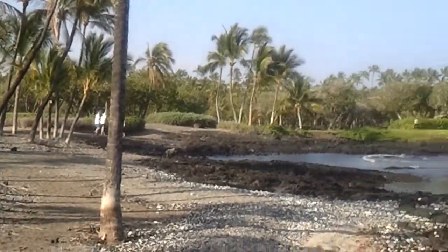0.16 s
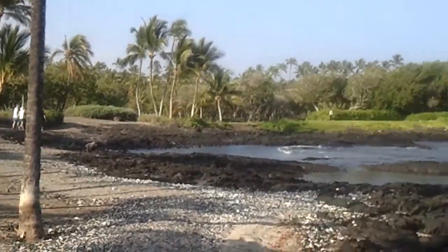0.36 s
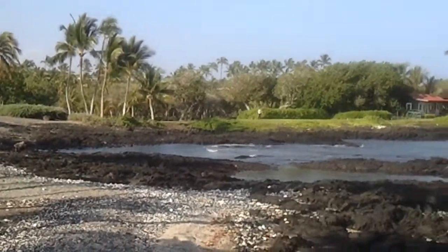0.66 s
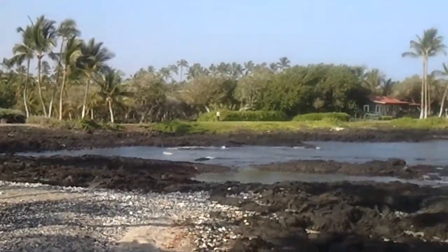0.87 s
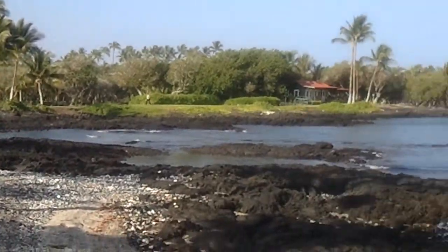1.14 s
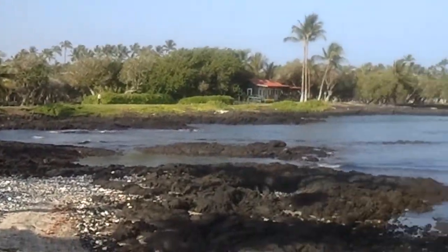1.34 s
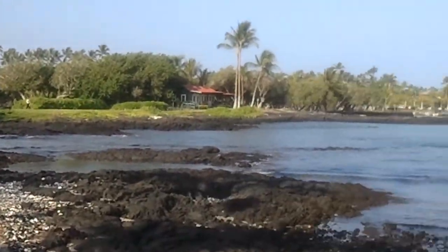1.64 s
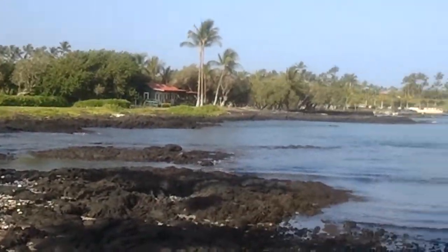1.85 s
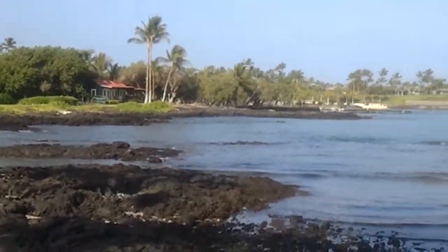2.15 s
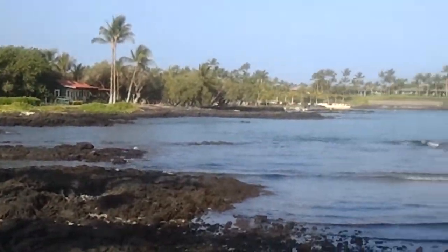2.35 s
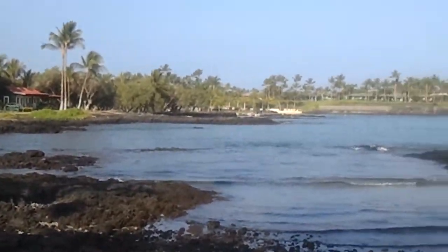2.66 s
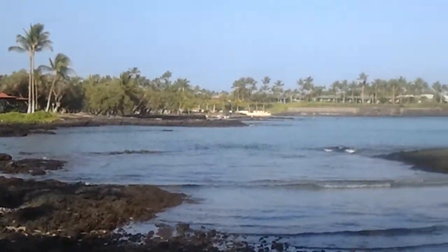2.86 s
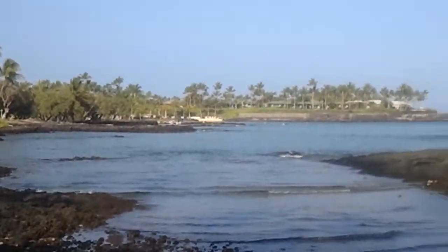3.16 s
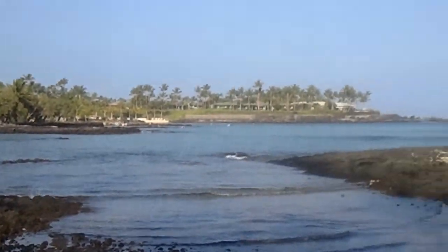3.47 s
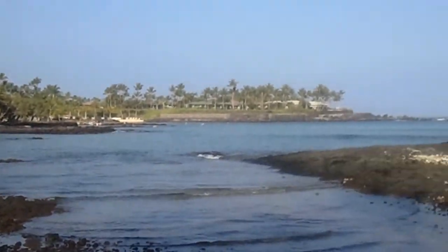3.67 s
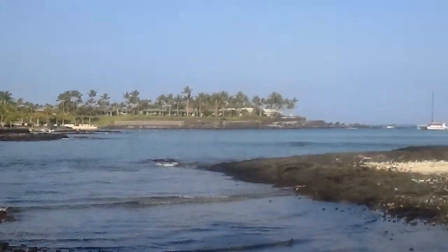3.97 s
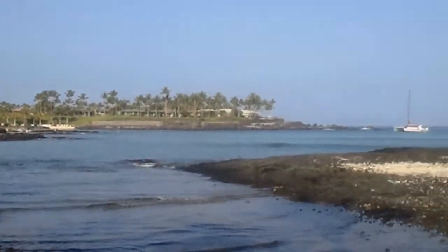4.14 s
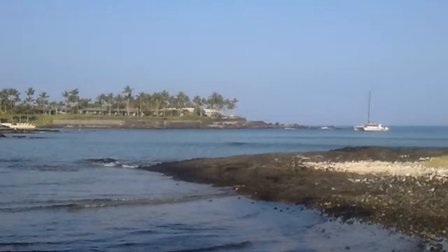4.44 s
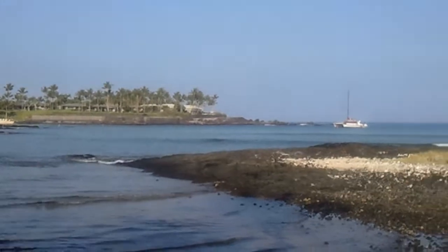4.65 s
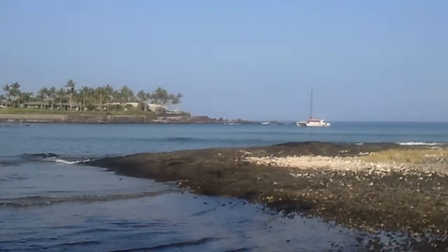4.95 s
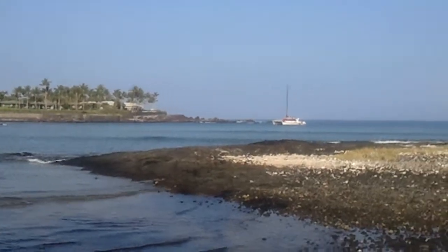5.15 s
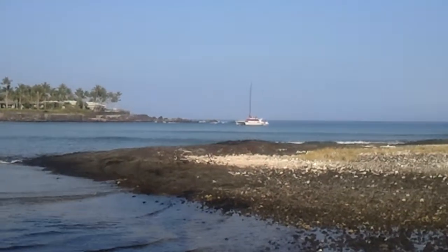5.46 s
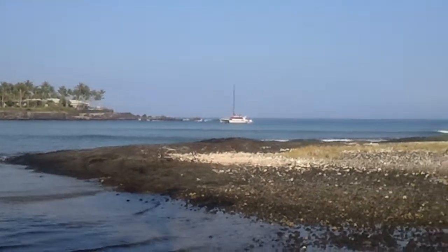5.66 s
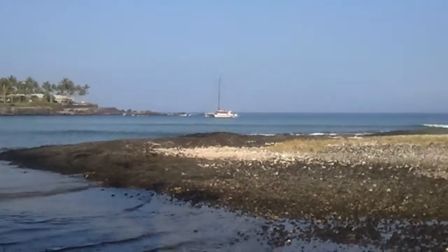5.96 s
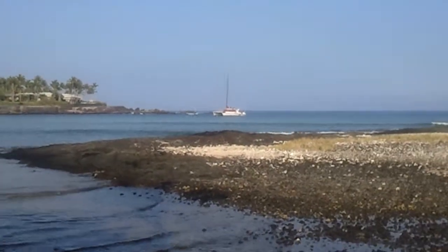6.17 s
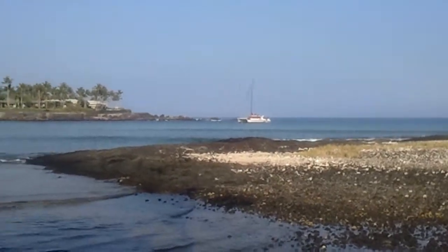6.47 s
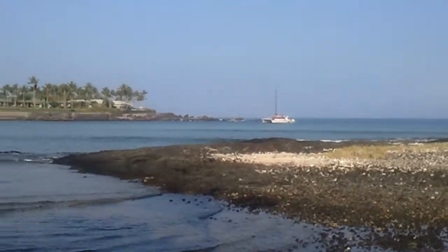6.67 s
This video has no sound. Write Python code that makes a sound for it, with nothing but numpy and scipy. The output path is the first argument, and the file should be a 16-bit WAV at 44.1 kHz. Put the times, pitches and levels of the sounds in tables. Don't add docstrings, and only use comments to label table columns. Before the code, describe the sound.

On a rocky shore, soft continuous wave wash with bubbling and faint foam fizz lies under everything. Loud, brittle gravel cracks come close by in the first 0.7 seconds, while a bird sings short burred chirps, two voices at once, through the first two seconds. Afterwards the water is left alone, with one sharp pebble click midway, tiny ticks and several hollow plops late. Mono, modest small microphone.

```python
import sys
import numpy as np
from scipy import signal
from scipy.io import wavfile
from scipy.ndimage import uniform_filter1d

SR = 44100
rng = np.random.default_rng(int(sys.argv[2]) if len(sys.argv) > 2 else 0)


def to_wav(sig):
    pcm = np.clip(np.atleast_2d(sig), -1, 1) * 32767
    pcm = np.round(pcm).astype(np.int16)
    wavfile.write(sys.argv[1], SR, pcm.T)


def volts_from_db(level):
    exponent = np.asarray(level, float) / 20
    return 10 ** exponent


N = 300321

# (time [s], length [s], grit level [dB], low push level [dB])
STEPS = [
    (0.037, .018, -19, -36.5),
    (0.051, .024, -12.5, -38),
    (0.093, .014, -27, -51),
    (.465, .026, -21.5, -30.5),
    (.488, .026, -19, -30),
    (0.511, 0.02, -14, -38),
]

# (time from main note [s], length [s], start pitch [Hz], end pitch [Hz], level re main note [dB])
FALLING = [
    [(-.003, .011, 3020, 2400, -1), (0, .035, 2580, 2360, 0)],
    [(-.018, .013, 2950, 2640, -5), (.037, .022, 1790, 1900, -3), (.062, .02, 2000, 1790, -15)],
    [],
    [(-.068, .058, 3200, 3300, -20)],
]
FLAT = [
    [(-.001, .005, 2950, 2360, -8.5), (0, 0.019, 2450, 2400, 0.5), (.022, 0.024, 2340, 2465, -3.5),
     (.041, .04, 2360, 2380, -8)],
    [(-.015, 0.012, 2840, 2700, -10), (.04, .009, 1800, 2210, -2.5), (.052, .007, 1835, 2280, 0.5),
     (.056, 0.028, 2070, 1700, -9)],
    [(-.063, 0.047, 2880, 3140, -14.5), (.054, 0.04, 1050, 920, -17)],
    [(-0.034, 0.096, 3400, 3800, -16.5)],
]
RISING = [
    [(0.0014, 0.012, 2380, 2660, 0.012)],
    [(.017, .026, 2680, 2620, -8)],
    [(.053, .06, 1930, 2020, -11.5)],
    [(-.012, .115, 2500, 2550, -7)],
]
LEVEL = [
    [(0, 0.02, 3070, 3140, -0.5), (.003, 0.023, 6800, 5970, -17)],
    [(0, .035, 6900, 6550, -18), (-.023, .016, 3200, 3150, -11)],
    [(.045, 0.043, 1885, 1850, -10)],
    [],
]


def rms_one(x):
    return x / np.sqrt(np.mean(x ** 2) + 1e-20)


def in_time(rows):
    s, *columns = np.transpose(rows)
    return [np.interp(np.arange(N) / SR, s, c) for c in columns]


def band(x, low_hz, high_hz):
    edges = [low_hz, min(high_hz, 20000)]
    return signal.sosfilt(signal.butter(2, edges, "band", fs=SR, output="sos"), x)


def drift(rate, size=N):
    r = np.exp(-2 * np.pi * rate / SR)
    run_in = 9000
    noise = rng.standard_normal(size + run_in)
    return rms_one(signal.lfilter([1], [1, -2 * r, r * r], noise)[run_in:])


def ring(clicks, hz, t60):
    r, w = volts_from_db(-60 / (t60 * SR)), 2 * np.pi * hz / SR
    return signal.lfilter([0, np.sin(w)], [1, -2 * r * np.cos(w), r * r], clicks + 1e-18)


def grains(per_s, spread_db, low_hz, high_hz, cycles):
    sizes = volts_from_db(spread_db * np.minimum(rng.exponential(1, N), 4)) * rng.choice([-1, 1], N)
    clicks = sizes * (rng.random(N) < per_s / SR)
    dealt = rng.integers(0, 16, N)
    pitches = np.geomspace(low_hz, high_hz, 16)
    return rms_one(sum(ring(clicks * (dealt == k), hz, cycles / hz) for k, hz in enumerate(pitches)))


def add(out, s, piece):
    i = round(s * SR)
    out[i:i + len(piece)] += piece[:N - i]


def swell(s, length, rise, fall):
    corners = [s - rise, s, s + length, s + length + fall]
    return np.interp(np.arange(N) / SR, corners, [0, 1, 1, 0])


def hump(hz, centre_hz, octaves):
    return np.exp(-(np.log2(hz / centre_hz) / octaves) ** 2)


def foam_sheets():
    # (time [s], length [s], level [dB], centre pitch [Hz])
    sheets = [
        (0.01, 0.26, -54, 3740),
        (0.59, .15, -45.5, 3630),
        (2.6, 0.16, -41, 3850),
        (2.92, 0.11, -40, 3830),
        (3.682, 0.25, -47.5, 3510),
        (5.434, 0.18, -47, 3770),
        (6.242, 0.09, -47, 3720),
        (6.5, 0.18, -46.5, 3680),
    ]
    rest_gain, rest_hz = volts_from_db(-57), 3830
    rise_s, fall_s = .15, .09
    gains = np.array([volts_from_db(db) * swell(s, length, rise_s, fall_s) for s, length, db, _ in sheets])
    total = rest_gain + gains.sum(axis=0)
    centre_hz = (rest_gain * rest_hz + np.array(sheets)[:, -1] @ gains) / total
    return total, centre_hz


def wash(wash_db, patchy_db):
    # (pitch [Hz], level per Hz [dB])
    colour = [(24, -56.5), (40, -27.5), (119, -8), (258, -3), (429, -9), (730, -1), (996, -6), (1300, -1.5),
              (1620, -4.5), (1890, -2.5), (2360, -6.5), (2700, -8), (3080, -10.5), (3760, -12.5),
              (8000, -24), (10400, -63), (17600, -120)]
    # (time [s], pitch [Hz], depth [dB])
    dip = [(0, 2880, -2.5), (3.2, 2870, -1.5), (3.7, 3060, 11), (4.3, 3080, 4.5), (5.7, 2730, 1),
           (6.81, 2680, 5)]
    low_edges = 22 * 2 ** np.arange(0, 3.9, 1 / 2)
    high_edges = 352 * 2 ** np.arange(0, 4.9, 1 / 6)
    edges = np.r_[low_edges, high_edges]
    waves, foam = 0, 0
    white = rng.standard_normal((2, N))
    together, own = drift(4.5), drift(15.0, size=N + 40 * 9000)
    points = np.array(colour)
    dip_hz, dip_db = in_time(dip)
    foam_gain, foam_hz = foam_sheets()
    for k, (low, high) in enumerate(zip(edges, edges[1:])):
        hz = np.sqrt(low * high)
        flicker_db = patchy_db * (0.49 * together + own[k * 9000:][:N])
        noise = band(white[k % 2], low, high) * volts_from_db(flicker_db)
        db = np.interp(np.log(hz), np.log(points[:, 0]), points[:, 1])
        waves = waves + volts_from_db(db - dip_db * hump(hz, dip_hz, 0.13)) * noise
        foam = foam + hump(hz, foam_hz, 0.16) * noise
    return volts_from_db(wash_db) * rms_one(waves) + volts_from_db(-9.5) * foam_gain * rms_one(foam)


def knocks():
    # (time [s], peak level [dB], pitch [Hz])
    hollows = [
        (1.964, -28, 630),
        (3.647, -34, 800),
        (4.618, -22, 1870),
        (5.084, -21.5, 765),
        (6.514, -27, 2150),
        (6.657, -20, 1420),
        (6.724, -24, 1530),
    ]
    out, click = np.zeros(N), np.eye(1, 1500)[0]
    for s, db, hz in hollows:
        add(out, s, volts_from_db(db - 8.0) * ring(click, hz, 0.028))
    return out


def shore():
    # (time [s], wash level [dB])
    waves = [(0.0, -42.5), (0.2, -43.5), (0.62, -43), (1.31, -45), (1.61, -45.5), (2.48, -43.5),
             (2.69, -42), (3.41, -41.5), (4.8, -41.5), (5.71, -42.5), (6.22, -42), (6.81, -39.5)]
    wash_db, = in_time(waves)
    swing_db = wash_db - wash_db.mean()
    gurgle_db = -52.5 - .8 * swing_db
    gurgle = volts_from_db(gurgle_db) * grains(400, 2.7, 620, 2520, cycles=18.0)
    spray_db = -58 - .3 * swing_db - .5 * drift(2.1)
    spray = volts_from_db(spray_db) * grains(1400, 3.8, 5200, 10500, cycles=4.5)
    return wash(wash_db + 0.67, patchy_db=1.16) + gurgle + knocks() + spray


def trees(x):
    t = np.arange(SR // 2) / SR
    t60_s, first_echo_s = .4, .008
    sparse = rng.standard_normal(len(t)) * (rng.random(len(t)) < .05)
    echoes = sparse * volts_from_db(-60 * t / t60_s) * (t > first_echo_s)
    return signal.fftconvolve(x, echoes / np.sqrt(np.sum(echoes ** 2)))[:N]


def notes():
    roughness = [
        .15,
        .5,
        0.849,
        1.7,
    ]
    # (time [s], length [s], start pitch [Hz], end pitch [Hz], rms level [dB])
    warble = [
        [(.125, 0.0085, 2320, 3050, -37.5)],
        [(.137, 0.019, 2510, 2200, -34.5), (.14, .023, 3150, 2950, -43)],
        [(.082, 0.019, 2366, 2170, -36), (.1, 0.029, 2990, 2995, -41), (.147, .02, 1690, 910, -35.5),
         (.165, 0.014, 2350, 2150, -36.5)],
        [(.085, .095, 2800, 2410, -38)],
    ]
    leads = [
        [(.573, 0.014, 3150, 4000, -39), (1.425, .009, 2350, 3420, -47), (1.439, 0.0062, 2700, 3450, -40),
         (1.77, 0.006, 3560, 4270, -36)],
        [(1.775, 0.078, 4780, 4880, -49), (1.13, .044, 1470, 2180, -47), (1.448, 0.017, 3170, 3100, -38),
         (1.477, .011, 4500, 2850, -45), (1.78, 0.012, 3670, 4500, -40), (1.797, 0.0062, 3300, 3080, -30.5),
         (1.809, .007, 3300, 3120, -32), (2.077, 0.029, 954, 1145, -45), (2.078, .026, 2084, 2136, -36.5),
         (2.083, 0.021, 3130, 3140, -41.5)],
        [(0.22, 0.04, 3650, 3950, -47), (1.3, 0.023, 3350, 3560, -41), (.218, .039, 2920, 3630, -40)],
        [(1.765, 0.02, 3960, 4470, -49), (1.79, .05, 3940, 3760, -41.5), (2.102, .013, 2230, 2900, -45)],
    ]
    turns = [
        [(.582, 0.042, 3930, 3850, -40), (1.25, .011, 3036, 2250, -38), (1.262, 0.017, 3050, 2150, -41)],
        [(.625, 0.021, 3100, 2600, -38), (1.172, 0.032, 3600, 3440, -43), (2.137, 0.021, 3190, 3650, -43),
         (2.159, 0.0209, 2310, 1624, -29)],
        [(.65, 0.058, 2390, 2010, -40.5), (1.845, .03, 1870, 1860, -38), (1.865, 0.052, 1249, 1295, -38),
         (2.177, 0.057, 1566, 927, -37)],
        [(1.86, .063, 2510, 2180, -51)],
    ]
    overtones = [(0.232, 0.1, 5800, 6700, -49), (.85, 0.017, 6370, 6700, -51.5),
                 (.865, .012, 5450, 5300, -49), (0.894, 0.048, 7340, 7050, -53),
                 (1.142, .05, 6400, 6500, -54), (1.433, 0.079, 6410, 6620, -46.5),
                 (1.455, .035, 5280, 5270, -51), (1.773, .067, 6500, 6310, -52),
                 (1.496, .04, 7240, 6360, -48.5)]
    # (shape, [(main note time [s], rms level [dB], pitch factor [ratio])])
    sung = [
        (FALLING, [(.295, -27.5, 0.99), (1.497, -29, 1)]),
        (FLAT, [(.903, -27.5, 0.99)]),
        (RISING, [(.575, -34.5, 1.06), (1.165, -37.5, .93)]),
        (LEVEL, [(1.828, -28, 0.99), (2.125, -29.5, 1)]),
    ]
    once = [(0, 0, 1)]
    rows = [(*note, roughness[2]) for note in overtones]
    for pattern, phrases in sung + [(warble, once), (leads, once), (turns, once)]:
        for s, db, pitch in phrases:
            for rough, voice in zip(roughness, pattern):
                for late, length, start_hz, end_hz, note_db in voice:
                    rows.append((s + late, length, pitch * start_hz, pitch * end_hz, db + note_db, rough))
    return rows


def bird():
    out, waver = np.zeros(N), (drift(220) + 1j * drift(210)) / np.sqrt(2)
    for k, (s, length, start_hz, end_hz, db, rough) in enumerate(notes()):
        count = round((length + 0.0033) * SR)
        share = np.clip(rough, 0, 1)
        pace = .3 + 1.2 * rough ** 2 * start_hz / 3000
        own = waver[(k * 3000 + (pace * np.arange(count)).astype(int)) % N]
        phase = 2 * np.pi * np.cumsum(np.linspace(start_hz, end_hz, count)) / SR
        steadiness = np.sqrt(1 - share ** 2) + 2.3 * share * own
        tone = rms_one(np.real(steadiness * np.exp(1j * phase)))
        add(out, s - .002, volts_from_db(db) * signal.windows.tukey(count, .45) * tone)
    effort = np.abs(uniform_filter1d(np.abs(out), 700)) ** 0.66
    air = rng.standard_normal(N)
    rasp = rms_one(band(air, 2200, 3300)) + volts_from_db(-7) * rms_one(band(air, 5400, 7500))
    return out + volts_from_db(-25.0) * effort * rasp


SETTLE_DB = -10.5


def crunch():
    coarse = grains(2200, 1.3, 1200, 3880, cycles=21.0)
    fine = grains(3500, 4.8, 2800, 9100, cycles=3.6)
    grit = coarse + volts_from_db(-15) * fine
    push = rms_one(band(rng.standard_normal(N), 220, 650))
    out = np.zeros(N)
    press_s, lift_s = .004, .012
    for s, length, grit_db, push_db in STEPS:
        settle_db = SETTLE_DB * np.clip((np.arange(N) / SR - s) / length, 0, 1)
        grinding = volts_from_db(grit_db + settle_db - 8) * grit + volts_from_db(push_db - 4) * push
        out += swell(s, length, press_s, lift_s) * grinding
    return out


def slips():
    gap_s, level_db, spread_db = .0027, 4, 5
    centre_hz, octaves, snap_db = 1420, .23, -18.5
    rows = []
    for s, length, grit_db, _ in STEPS:
        for k, (late, size, pitch) in enumerate(rng.standard_normal((12, 3))):
            t = gap_s * (k + .3 * late)
            db = grit_db + level_db + SETTLE_DB * t / length + spread_db * size
            if t < length:
                rows.append((s + t, min(db, -13), centre_hz * 2 ** (octaves * pitch), snap_db))
    return rows


def stones():
    # (time [s], peak level [dB], ring pitch [Hz], level of the brighter
    # snap re peak [dB])
    cracks = [(0.0392, -9, 1590, -17), (0.0426, -11, 1380, -24), (0.0531, -12, 880, -19),
              (0.0561, -9, 1100, -20), (0.0605, -12, 1420, -19), (0.0642, -7, 1030, -27),
              (0.0661, -10, 1140, -28), (0.0906, -11, 1360, -23), (0.2326, -24, 1250, -21),
              (0.2938, -9, 1460, -14), (0.3058, -13, 1660, -13), (0.3136, -17, 1500, -24),
              (0.4626, -19, 1680, -21), (0.4832, -19, 3320, -24), (0.488, -11, 1850, -28),
              (0.4971, -13, 1680, -23), (0.5087, -4, 1550, -25), (0.5116, -10, 1490, -25),
              (0.5133, -9, 1440, -22), (0.5307, -18, 1210, -24), (0.6638, -13, 1900, -18),
              (0.69, -25, 1870, -17), (2.061, -24, 2500, -13), (2.072, -25, 2500, -12),
              (3.3687, -14, 2100, -17), (5.952, -30, 3000, -12), (6.65, -26, 1400, -20)]
    # (time [s], peak level [dB], pitch [Hz])
    ticks = [(0.175, -38, 6500), (.197, -38, 5200), (0.4742, -30, 7400), (.7594, -61, 5500),
             (1.0912, -27, 5460), (1.9778, -34, 6070), (2.2476, -39, 5400), (2.7894, -44, 7600),
             (3.1053, -34.5, 7500), (5.499, -44, 7800), (5.876, -29.5, 4200), (5.894, -35.5, 7300),
             (5.9523, -36, 7740), (6.1994, -31, 3800), (6.325, -31, 4200), (6.4, -41, 7550),
             (6.6294, -37, 4100), (6.766, -35, 6500)]
    out, click = np.zeros(N), np.eye(1, 500)[0]
    rows = cracks + slips()
    signs = rng.choice([-1, 1], (100, 1))
    for (s, db, hz, snap_db), (sign,) in zip(rows, signs):
        cycles = 5.5 * volts_from_db(1.8 * max(db + 9, 0))
        body = ring(ring(click, hz, cycles / hz), 1.25 * hz, 2.2 / hz)
        snap = 3.4 * ring(click, 3200, .0022) - 1.1 * ring(click, 6400, .0016)
        sign = 1 if db > -10 else sign
        add(out, s - .0002, sign * volts_from_db(db) * (body / body.max() + volts_from_db(snap_db + 2.3) * snap))
    for s, db, hz in ticks:
        tick = ring(click, hz, .004) - .4 * ring(click, .55 * hz, .002)
        add(out, s, volts_from_db(db + 3.1) * tick)
    return out


def scene():
    song = bird()
    thin = signal.butter(3, 300, "high", fs=SR, output="sos")
    shoe = signal.sosfilt(thin, volts_from_db(-2.93) * stones() + crunch())
    echoes = trees(volts_from_db(-10.5) * song + volts_from_db(-21.0) * shoe)
    return (shoe + song + echoes + shore())[None]


def low_pass(x):
    return signal.sosfilt(signal.butter(12, 9100, fs=SR, output="sos"), x)


def record(dry):
    cut = signal.sosfilt(signal.butter(2, 43, "high", fs=SR, output="sos"), dry)
    cut = signal.sosfilt(signal.butter(10, 7930, fs=SR, output="sos"), cut)
    cut = signal.sosfilt(signal.cheby2(12, 50, 9450, fs=SR, output="sos"), cut)
    return low_pass(cut)


dry = scene()
out = record(dry)
to_wav(out)
```